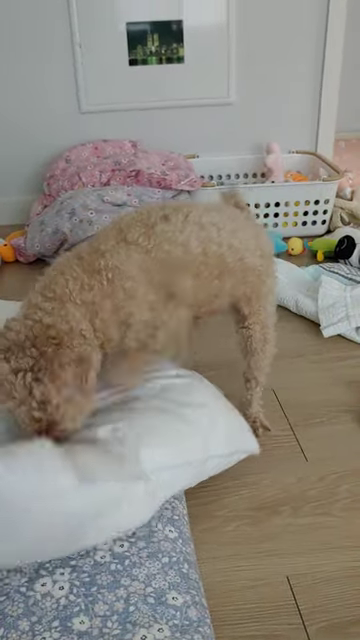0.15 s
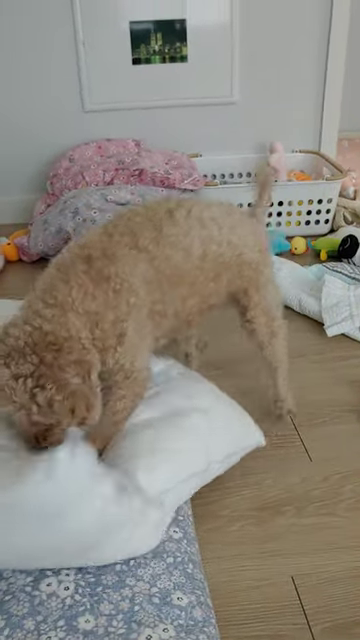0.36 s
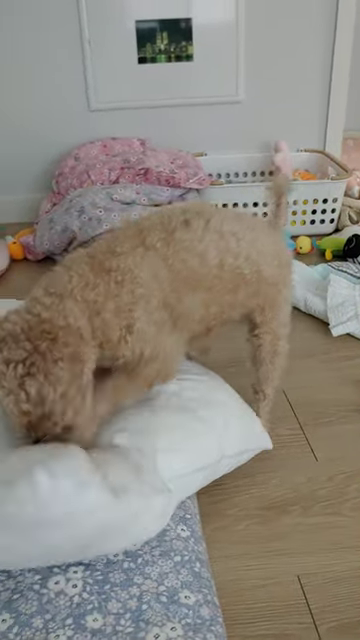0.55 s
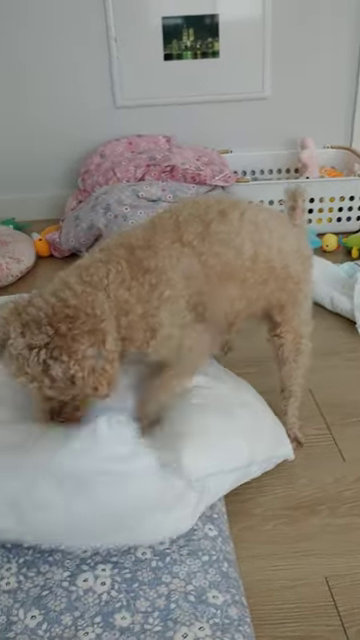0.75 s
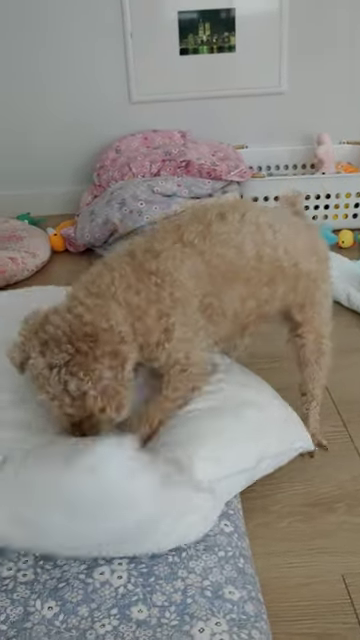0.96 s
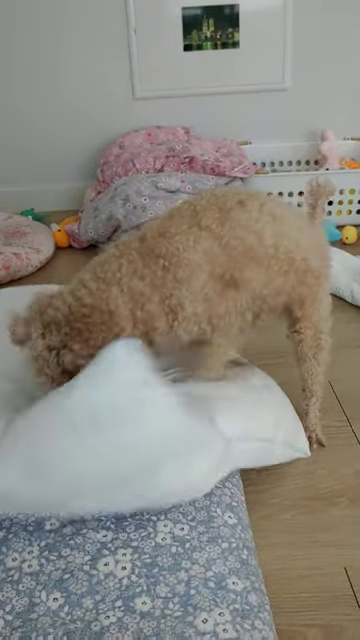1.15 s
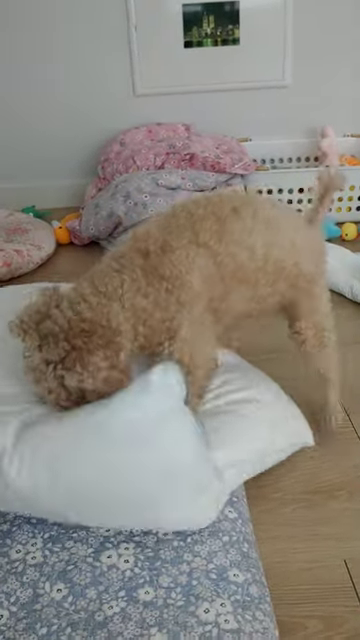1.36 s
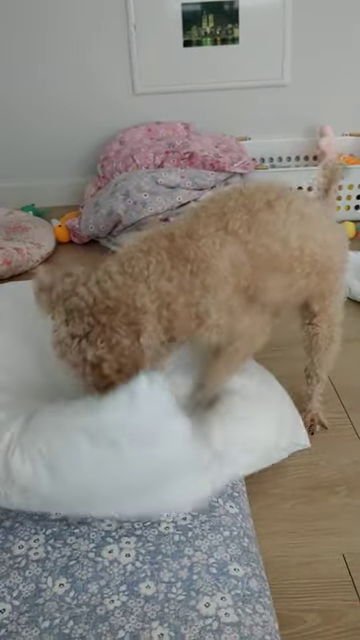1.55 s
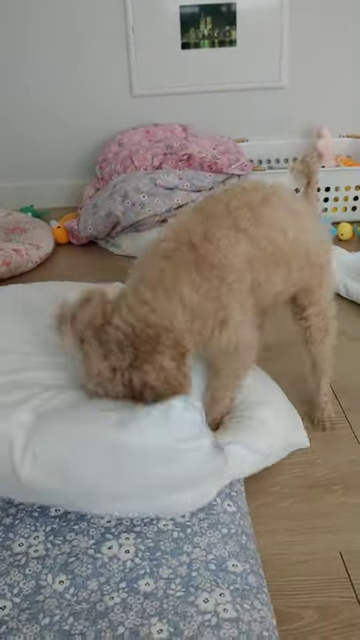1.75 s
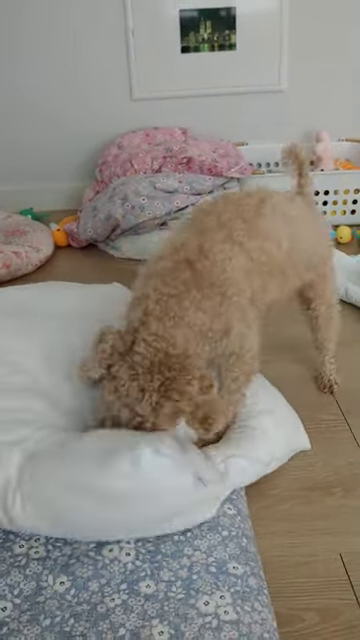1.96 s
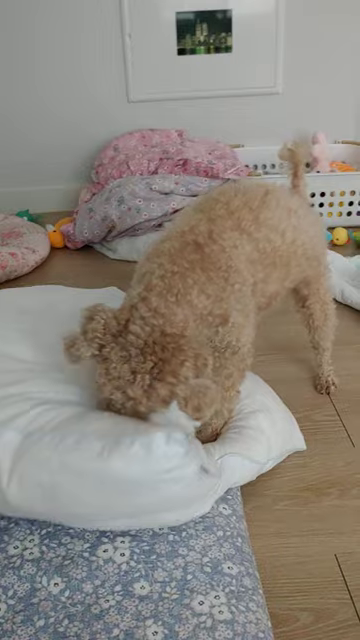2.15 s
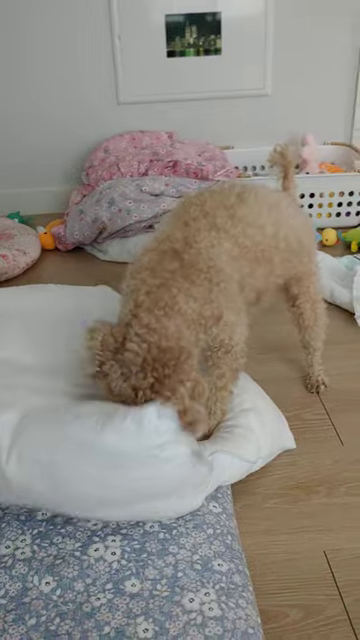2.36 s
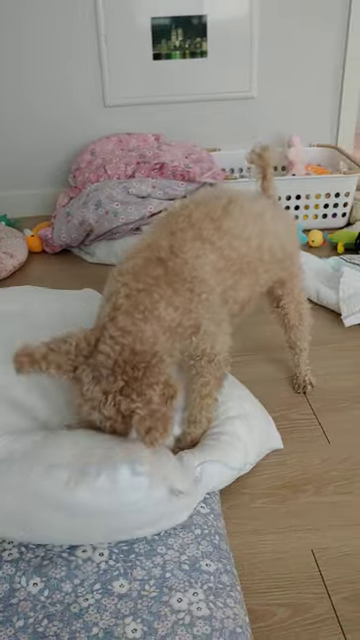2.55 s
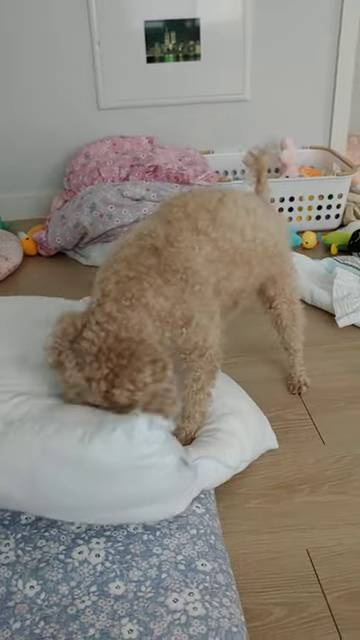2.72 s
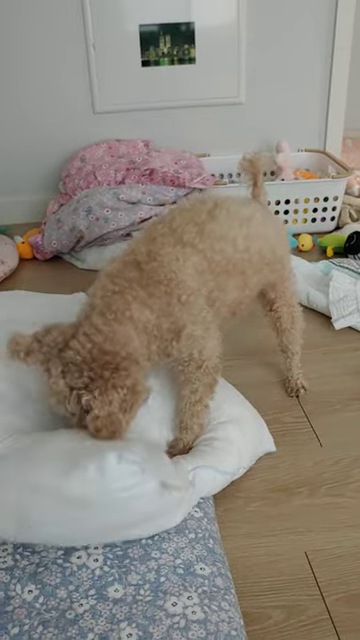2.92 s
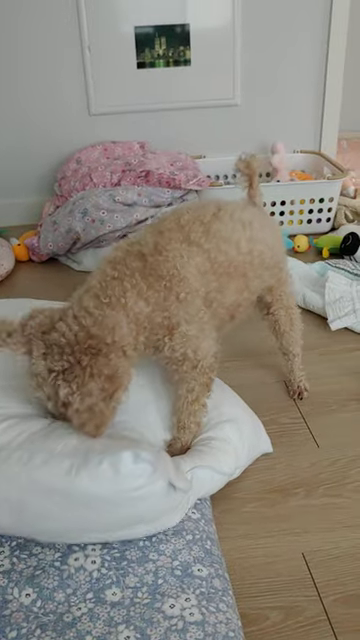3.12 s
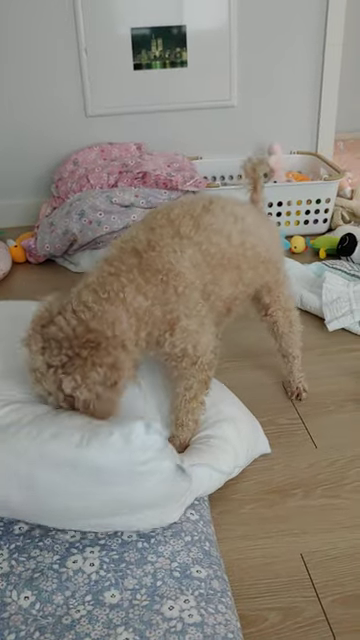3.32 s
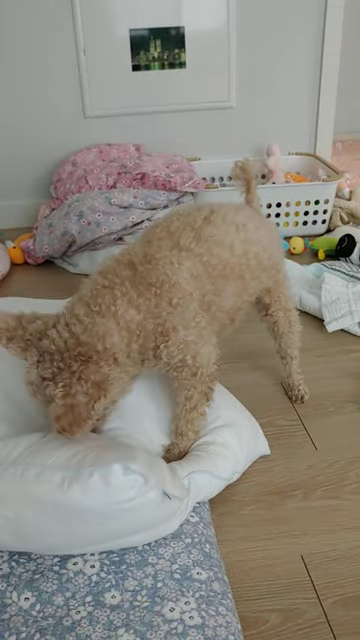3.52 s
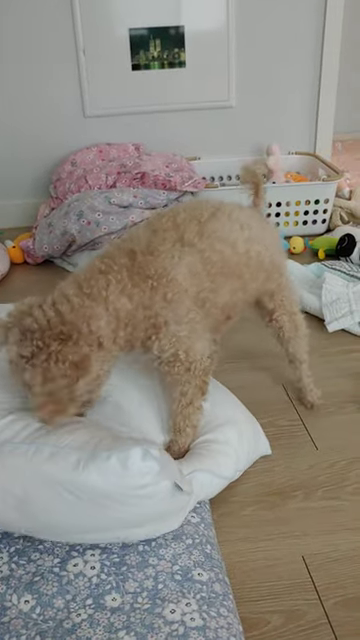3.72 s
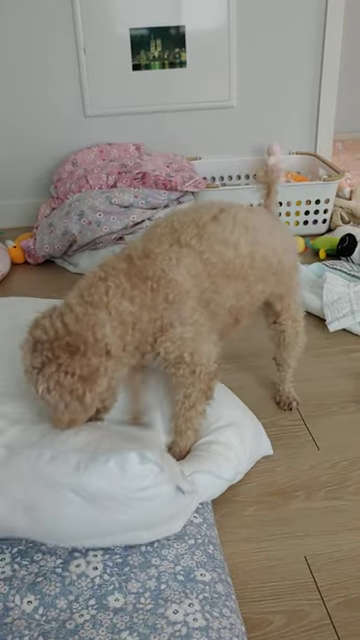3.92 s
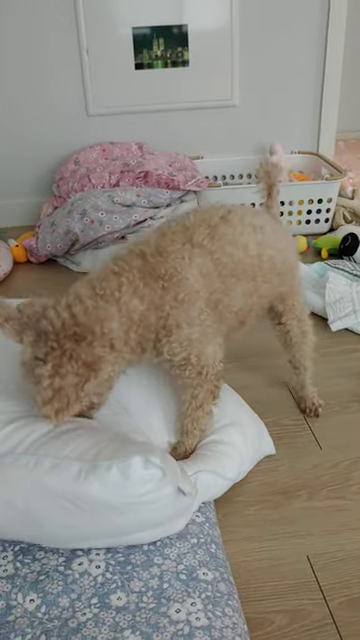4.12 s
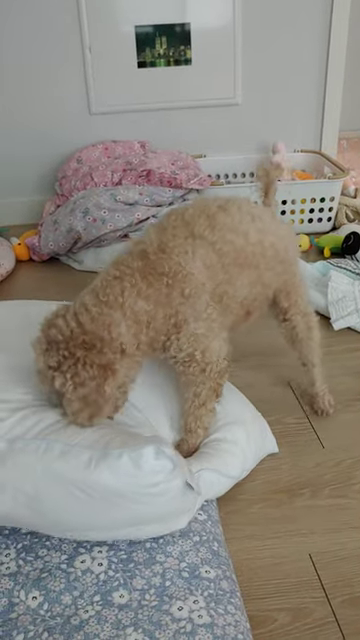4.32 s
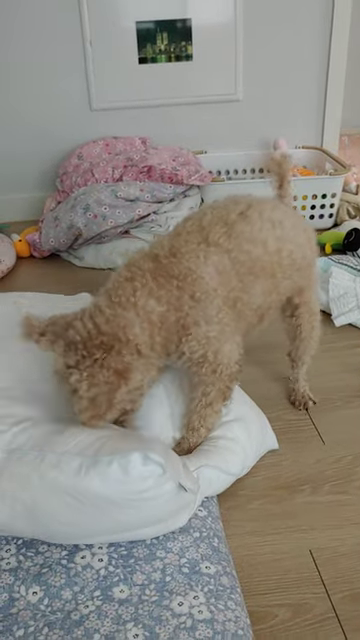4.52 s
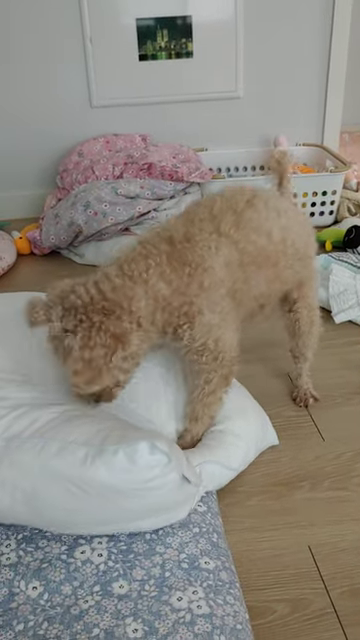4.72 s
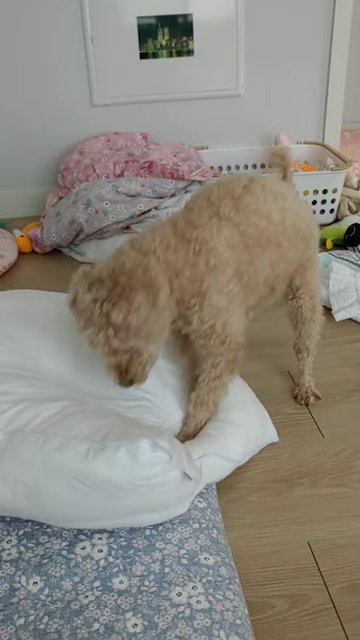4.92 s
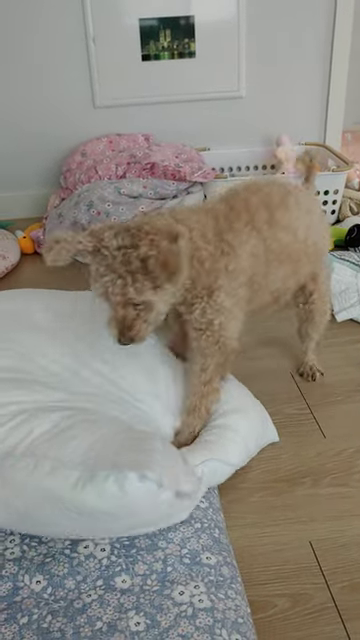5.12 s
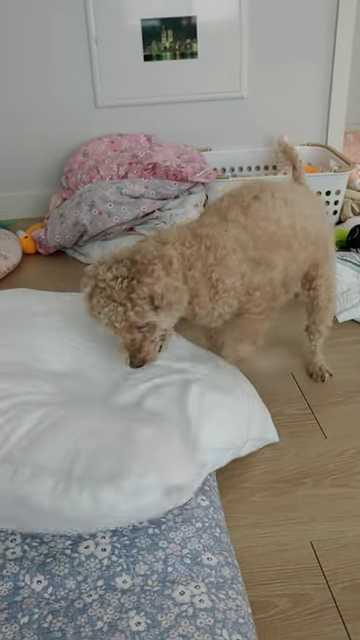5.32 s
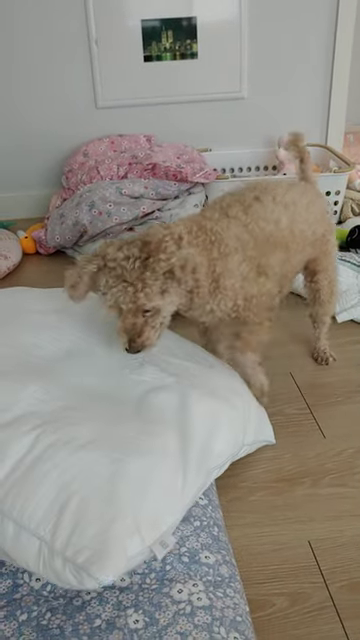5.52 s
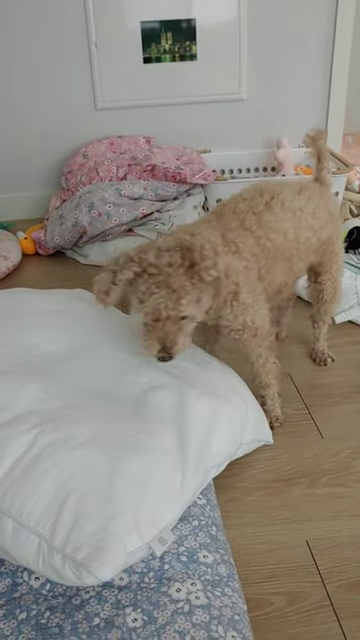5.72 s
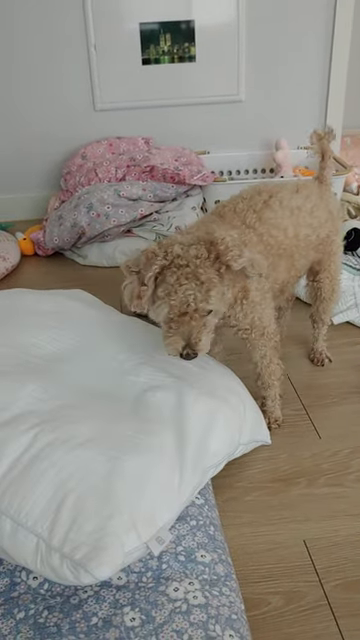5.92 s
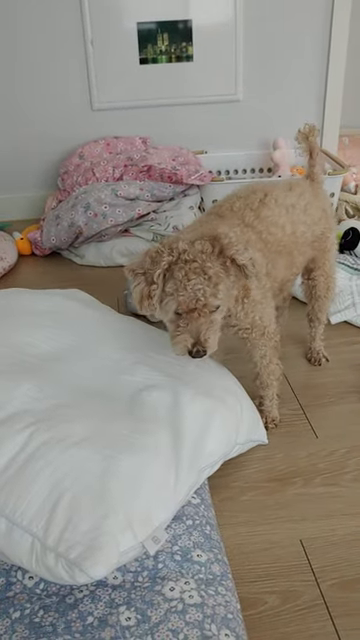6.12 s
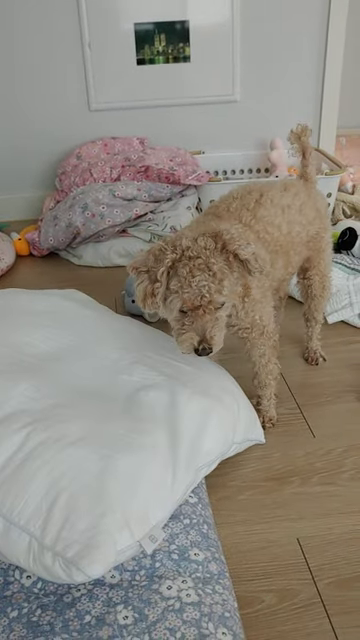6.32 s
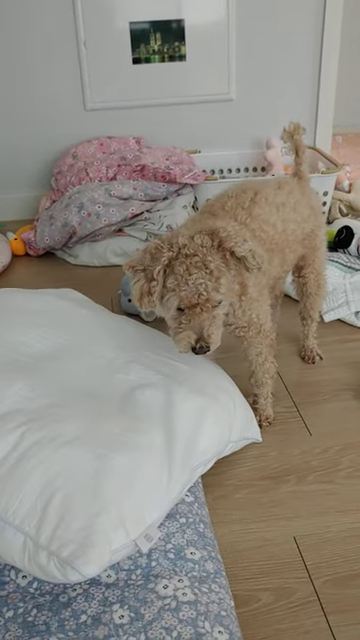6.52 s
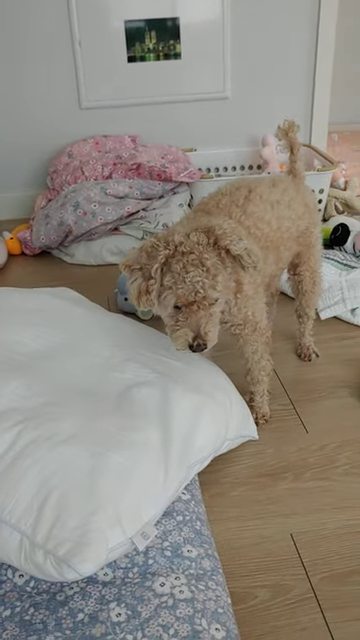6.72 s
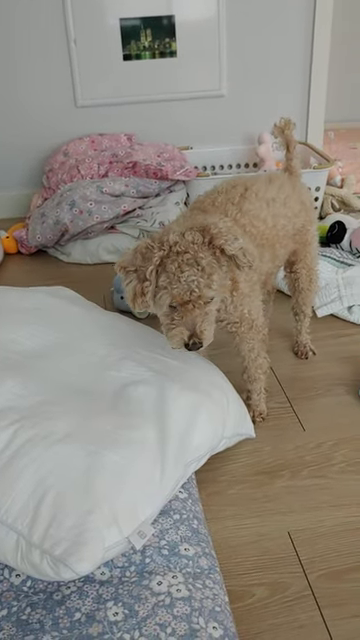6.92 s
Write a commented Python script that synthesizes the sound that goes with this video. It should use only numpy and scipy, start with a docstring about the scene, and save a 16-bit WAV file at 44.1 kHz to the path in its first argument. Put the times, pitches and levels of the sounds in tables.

```python
"""On a wooden floor in a quiet room, a small dog digs at a pillow close to a phone. Each paw stroke thuds through
the stuffing into the boards (noise and force pulses in low resonances); claws scrape (coloured grit), catch threads
(short sines) and zip over the weave (gliding tones). The cover rustles and snaps (grainy hiss). The dog snorts once
(noise in nasal resonances), then nudges the pillow. Room tone hums behind, with microphone hiss.
"""
import sys
import numpy as np
from scipy import signal
from scipy.fft import rfft, irfft, next_fast_len
from scipy.io import wavfile
from scipy.ndimage import uniform_filter1d, map_coordinates

SR = 44100
rng = np.random.default_rng(int(sys.argv[2]) if len(sys.argv) > 2 else 0)


def transcribe(signal):
    """Save signal, clipped to [-1, 1], as a 16-bit WAV file at the path in sys.argv[1]."""
    frames = np.atleast_2d(signal).T
    limited = np.clip(frames, -1, 1)
    pcm = np.round(limited * 32767).astype(np.int16)
    wavfile.write(sys.argv[1], SR, pcm)


N = 307397
T = np.arange(N) / SR

# pads on cloth, relative spectral density: freq_hz, density_db_per_hz
DRAG_COLOUR = [(250, -50), (650, -1.5), (1000, -2.5), (1600, -16), (2200, -26.5), (4000, -112)]


def amp(db):
    """Gain of a level in dB."""
    return 10 ** (np.asarray(db) / 20)


def unit(x):
    """Scaled to rms 1."""
    return x / np.sqrt(np.mean(x ** 2) + 1e-20)


def along(points, hz):
    """Interpolate (Hz, value) points on a log frequency axis."""
    point_hz, value = np.transpose(points)
    return np.interp(np.log(hz + 1), np.log(point_hz + 1), value)


def wobble(rate_hz):
    """Smooth random curve with rate_hz knots a second."""
    return map_coordinates(rng.standard_normal(int(N * rate_hz / SR) + 4), [T * rate_hz])


def filtered(x, response):
    """Filter x by a complex response of frequency."""
    size = next_fast_len(N + SR // 2)
    spectrum = rfft(x, size) * response(np.fft.rfftfreq(size, 1 / SR))
    return irfft(spectrum, size)[..., :N]


def resonances(modes):
    """Response of causal (centre_hz, width_hz, level_db) resonances, summed with alternating sign."""
    def response(f):
        total = 0
        for k, (centre, width, db) in enumerate(modes):
            damping = 1j * f * width
            total = total + (-1) ** k * amp(db) * damping / (centre * centre - f * f + damping)
        return total
    return response


def grit(rate_hz, spread_db, smooth, patchy_db):
    """Small slips of uneven size over a share of smooth noise; the colour wanders as the contact moves."""
    slips = (rng.random(N) < rate_hz / SR) * amp(spread_db * rng.exponential(size=N))
    slips = slips * rng.standard_normal(N)
    z = signal.stft(unit(slips) + smooth * rng.standard_normal(N), nperseg=512)[2]
    patches = uniform_filter1d(rng.standard_normal(z.shape), size=4, axis=0)
    patches = uniform_filter1d(patches, size=5, axis=1)
    return unit(signal.istft(z * amp(patchy_db * unit(patches)), nperseg=512)[1][:N])


def pair(noises, gain, alike):
    """Left and right from two unrelated signals, with a set likeness by frequency."""
    def mid_side(hz):
        turn = np.arccos(np.clip(along(alike, hz), -1, 1)) / 2
        return gain(hz) * [np.cos(turn), np.sin(turn)]
    mid, side = filtered(noises, mid_side)
    return np.array([mid + side, mid - side])


def swells(rows, fall_db_per_s):
    """Level in dB of gestures that rise, hold with a swell or sag, and fall; the loudest wins.

    Rows: full_s, rise_s, hold_s, level_db, optional swell_db.
    """
    rise_db = 19.5  # gained during a rise
    level = np.full(N, -140.0)
    for s, rise, hold, db, *swell_db in rows:
        span = slice(max(round((s - 0.4) * SR), 0), round((s + 0.8) * SR))
        t = T[span] - s
        held = db + sum(swell_db) * np.clip(t / max(hold, 0.001), 0, 1)
        before = rise_db * np.minimum(t, 0) / max(rise, 0.002)
        after = fall_db_per_s * np.maximum(t - hold, 0)
        level[span] = np.maximum(level[span], held + before - after)
    return level


def strokes():
    """Levels in dB of push, drag, scrape and rustle, all timed by the same paw strokes."""
    # full_s, rise_s, hold_s, swell_db, push_db, drag_db, scrape_db, rustle_db
    paw_strokes = [(0, 0.012, 0.063, -11, -43.5, -54, -68.5, -64),
                   (0.136, 0.036, 0.052, 8, -52.5, -64, -72.0, -75.5),
                   (0.31, 0.091, 0.084, 3.5, -48.0, -63.5, -71, -67.5),
                   (0.491, 0.058, 0.061, 4, -51.5, -63, -71.5, -71),
                   (0.679, 0.029, 0.063, -8, -33.0, -47.5, -69, -66.5),
                   (0.815, 0.043, 0.071, -4.5, -44.5, -55.5, -64.5, -67.5),
                   (1.043, 0.09, 0.17, -4, -52.5, -63.5, -70.5, -72.5),
                   (1.187, 0.037, 0.02, 5, -51.5, -63.5, -71, -72.5),
                   (1.34, 0.038, 0.069, -7.5, -45.5, -57, -67.5, -60.0),
                   (1.626, 0.081, 0.075, 2, -54.5, -63, -71, -67.5),
                   (1.784, 0.064, 0.101, -8.5, -51, -65, -74, -68.5),
                   (2.088, 0.048, 0.011, -1, -44.5, -59, -65.5, -71),
                   (2.419, 0.057, 0.036, -6, -46, -56.5, -66.5, -71.0),
                   (2.66, 0.045, 0.07, 0.5, -63, -68, -71, -76.5),
                   (2.724, 0.025, 0.022, -1.5, -47.5, -56, -66, -74.5),
                   (3.051, 0.035, 0.035, -8, -36, -53, -69, -71),
                   (3.35, 0.048, 0.0093, 3.5, -43.5, -59, -68.5, -77.5),
                   (3.412, 0.013, 0.0053, -8, -40.5, -56.5, -67.5, -73.5),
                   (3.659, 0.058, 0.006, 7, -47, -60, -67, -72),
                   (3.713, 0.013, 0.0058, -10.5, -33.5, -48.5, -64, -72),
                   (4.018, 0.06, 0.015, -3.5, -40, -54.5, -64.5, -72),
                   (4.323, 0.038, 0.026, -3, -38.5, -54.5, -67, -73),
                   (4.652, 0.06, 0.012, -4, -42.5, -52, -58.5, -64),
                   (4.666, 0.018, 0.006, -7, -31.5, -43, -54, -67),
                   (4.953, 0.028, 0.008, -4.5, -43.5, -56.5, -66.5, -75),
                   (4.988, 0.019, 0.011, 0.5, -41.5, -48.5, -65, -72),
                   (5.155, 0.065, 0.11, 2.5, -73, -78.5, -75, -78.5),
                   (5.278, 0.056, 0.052, -4, -58.5, -61.5, -67.5, -65),
                   (5.353, 0.057, 0.041, 5, -65.5, -67, -73.5, -71.0),
                   (5.804, 0.078, 0.05, 2.5, -77, -80.0, -84.5, -91.0),
                   (6.03, 0.013, 0.051, -6, -43.5, -51.0, -78.5, -97)]
    falls_db_per_s = 220, 209, 270, 180  # push, drag, scrape, rustle
    curves = []
    for k, fall in enumerate(falls_db_per_s):
        rows = [(s, rise, hold, levels[k], swell_db) for s, rise, hold, swell_db, *levels in paw_strokes]
        curves.append(swells(rows, fall))
    return curves


def paws():
    """Landings shake the boards to their lowest modes; the lighter pushes only knead the stuffing above them."""
    # landings: time_s, weight_db, tap_db (toe tap relative to the weight)
    landings = [(0.137, -35, -9), (0.493, -34, -7), (0.543, -37, 1), (0.683, -27, 0), (0.693, -23, -4),
                (0.819, -50, -4), (0.874, -37, -8), (1.041, -34.5, -6), (1.192, -41, -13), (1.335, -29, 0),
                (2.078, -31, -0.5), (2.407, -33, -4), (2.722, -32, -5), (3.037, -23.5, -4),
                (3.065, -36, -6), (3.349, -30.5, 5.5), (3.409, -31.5, -9), (3.665, -28.5, -11),
                (3.704, -31, -16), (4.011, -29, -1), (4.319, -23.5, -15), (4.616, -25.5, -6),
                (4.942, -36, -1.5), (4.989, -39, -4), (5.272, -44, 5.5), (5.386, -43, -2), (6.022, -46, 5)]
    # floor and stuffing resonances: centre_hz, width_hz, level_db
    board_modes = [(72, 22, -10), (117.6, 33, 2.5), (169.6, 33, -1), (231.5, 30.7, -0.5), (304, 66, -3.5),
                   (400.8, 43.7, -1), (530.8, 38.4, -3.5), (595, 38, -5)]
    push_db = strokes()[0]
    modes = resonances(board_modes)

    def boards(hz):
        return modes(hz) / (1 + 1j * hz / 900) ** 2  # the padding swallows the treble

    def stuffing(hz):
        return boards(hz) * (1j * hz / 170) / (1 + 1j * hz / 170)

    def pad_force(u):
        return u ** 2 * (3 - u) * np.exp(-u)  # the force swells and lets go

    lumps = grit(rate_hz=400, spread_db=1.5, smooth=1.0, patchy_db=2.0)
    lumps = lumps / np.std(filtered(lumps, boards))
    blows, settle = np.zeros(N + SR), np.zeros(N + SR)
    t = np.arange(SR // 8) / SR
    for s, db, tap_db in landings:
        start = round((s + 0.003014) * SR)
        force = pad_force(t / 0.00095) + amp(tap_db) * pad_force(t / 0.00035)
        blows[start:][:len(t)] += amp(db - 6.5) * force
        settle[start:][:len(t)] += amp(db - 11.5 - 60 * t / 0.14)  # the stuffing settles after the landing
    blows, settle = blows[:N], settle[:N]
    knead = filtered(amp(push_db + 1.77 * wobble(40)) * lumps, stuffing)
    thud = filtered(settle * lumps + 2.0 * blows, boards)
    creases = unit(filtered(lumps, lambda hz: amp(along(DRAG_COLOUR, hz))))
    crush = amp(-25.0) * settle * creases  # the cover creases with it
    return knead + thud + 1.26 * blows + crush


def scrapes():
    """Pads and claws drag over the cover: one stream of slips in a dull and a bright colour."""
    # claws on cloth, relative spectral density: freq_hz, density_db_per_hz
    scrape_colour = [(700, -59), (1500, -3), (2300, 0.5), (3300, -10), (4000, -16), (7000, -32)]
    _, drag_db, scrape_db, _ = strokes()
    slips = grit(rate_hz=900, spread_db=1.0, smooth=0.89, patchy_db=3.5)
    drag = unit(filtered(slips, lambda hz: amp(along(DRAG_COLOUR, hz))))
    scrape = unit(filtered(slips, lambda hz: amp(along(scrape_colour, hz))))
    return amp(1.22 * wobble(60)) * (amp(drag_db) * drag + amp(scrape_db) * scrape)


def snags():
    """Claws catch single threads: short decaying sines scattered around 2100 Hz."""
    # start_s, level_db
    catches = [(0.4848, -44), (0.8086, -42.5), (3.066, -55), (3.654, -45), (3.7104, -45.5), (4.004, -44),
               (4.2984, -57), (4.3634, -46), (4.6615, -47), (4.6674, -45), (4.67, -30), (4.9853, -35.5),
               (4.991, -46), (5.0001, -37), (5.2729, -49)]
    out = np.zeros(N + SR)
    t = np.arange(SR // 50) / SR
    for s, db in catches:
        pitch_hz = 2100 * (1 + 0.11 * rng.standard_normal())
        envelope = amp(db - 60 * t / 0.0044) * (1 - np.exp(-t / 0.0003))
        out[round(s * SR):][:len(t)] += envelope * np.sin(2 * np.pi * pitch_hz * t)
    return out[:N]


def zips():
    """Claws on fast strokes sing at the rate at which they cross the threads of the weave."""
    # peak_s, first_rate_hz, settled_rate_hz, peak_db, t60_s
    runs = [ (2.099, 1612, 1535, -52, 0.19), (3.07, 1650, 1597, -54.5, 0.17),
            (3.345, 2250, 2480, -63, 0.17), (3.38, 1850, 1599, -48.5, 0.21),
            (3.652, 2500, 1880, -56, 0.059), (3.689, 1628, 1497, -46, 0.22),
            (4.945, 2200, 2160, -60.5, 0.13), (5.25, 2700, 2780, -72, .15), (5.285, 1497, 1610, -59, .22),
            (5.379, 2030, 2080, -61.5, 0.14), ]
    rise_s, settle_s = 0.0183, 0.0142
    out = np.zeros(N)
    for s, first_hz, settled_hz, peak_db, t60 in runs:
        glide = np.exp(-np.maximum(T - s + rise_s / 2, 0) / settle_s)
        hz = settled_hz + (first_hz - settled_hz) * glide
        db = swells([(s, rise_s, 0, peak_db)], 60 / t60)
        # the claw stutters, so the pitch wavers
        phase = 2 * np.pi * np.cumsum(hz * (1 + 0.028 * wobble(200))) / SR
        overtone = amp(-19) * (hz < 1950) * np.sin(2 * phase)  # only slow strokes carry it
        out += amp(db + 2.5 * wobble(120)) * (np.sin(phase) + overtone)
    return out


def cover():
    """The fabric hisses in fine grains as it slides and gives a few ticks and flicks."""
    # the cover slipping by itself: full_s, rise_s, hold_s, level_db
    slides = [(0.945, 0.045, 0.079, -73.5), (1.535, 0.008, 0.024, -67.5), (1.86, 0.02, 0.04, -62.5),
              (3.129, 0.043, 0.02, -78.5), (3.827, 0.028, 0.0087, -73.5), (4.116, 0.035, 0.013, -68),
              (5.096, 0.014, 0.014, -57.5), (5.186, 0.055, 0.034, -75), (5.595, 0.06, 0.073, -67),
              (5.744, 0.013, 0.02, -66.0)]
    # crisp ticks and short flicks: peak_s, peak_db, rise_s, t60_s
    snaps = [ (0.5097, -52, .0003, 0.014), (1.431, -48, 0.0047, 0.027), (1.534, -47.5, 0.00023, 0.014),
             (1.865, -46.5, 0.0055, 0.021), (1.912, -47, 0.0018, 0.018), (3.1234, -58, 0.00024, 0.0084),
             (3.49, -62.5, 0.00025, 0.0083), (3.906, -66, 0.00034, .012), (4.102, -58, 0.00045, 0.011),
             (4.12, -48, 0.00064, 0.01), (4.501, -54, 0.00024, 0.0069), (5.085, -50, .0003, 0.012),
             (5.101, -49, 0.0085, 0.027), (5.4998, -57.5, .0003, 0.012), (5.5558, -53, 0.00024, 0.012),
             (5.7434, -46.5, 0.00026, 0.0078), ]
    # relative spectral density: freq_hz, density_db_per_hz
    cloth_colour = [(2060, -20), (3500, -13.5), (5160, -11.5), (6530, 0.5), (7850, -4), (8910, -2.5),
                    (9810, -6.5), (10900, -19.5), (12600, -2.5), (15100, -16.5), (16000, -2)]

    def colour(hz):
        return amp(along(cloth_colour, hz))

    db = np.maximum(strokes()[-1], swells(slides, fall_db_per_s=315))
    rub = amp(db + 2.2 * wobble(70)) * grit(rate_hz=2500, spread_db=2.5, smooth=0.74, patchy_db=3.0)
    flick = np.zeros(N)
    for s, peak_db, rise, t60 in snaps:
        away = abs(T - s)
        before = amp(peak_db) * np.exp(-away / max(rise, 1e-4))
        after = amp(peak_db - 60 * away / max(t60, 0.002))
        flick += np.where(T < s, before, after)
    cloth = rub + flick * rng.standard_normal(N)
    colour_rms = np.sqrt(np.mean(colour(np.linspace(0, SR / 2, num=999)) ** 2))
    return filtered(cloth, colour) / colour_rms


def snort():
    """Air forced through the nose: turbulent noise in its resonances."""
    # full_s, rise_s, hold_s, level_db
    breath = (5.592, .018, .075, -58.5)
    # centre_hz, width_hz, level_db
    nose_modes = [(655, 110, 4.5), (1074, 37, 10), (1500, 150, 3.5), (2130, 210, 1.5), (2590, 100, 11),
                  (3040, 470, -1.5)]
    db = swells([breath], fall_db_per_s=330)
    flow = unit(filtered(rng.standard_normal(N), resonances(nose_modes)))
    return amp(db + 0.95 * wobble(50)) * flow


def arrive(x, lag_s):
    """The phone's two ports sit apart, so they differ in colour and phase; lag_s is the extra path to the left."""
    # freq_hz, left_minus_right_db
    port_tilt = [(60, -1), (150, 2), (380, -4.5), (950, -6.5), (2380, 0.5), (5980, 7.5), (15000, -13)]
    # freq_hz, left_lead_rad
    port_lead = [(0, 0), (600, -0.3), (1000, 2), (1900, -1), (3000, 0.5), (3800, 4), (5000, 5.5),
                 (15000, 8)]
    side = np.array([[1], [-1]]) / 2

    def ports(hz):
        phase = along(port_lead, hz) - 2 * np.pi * hz * lag_s
        return amp(side * along(port_tilt, hz)) * np.exp(1j * side * phase)
    return filtered(x, ports)


def room(x):
    """Floor and furniture answer in a fast decay, walls in a longer one; new tail every 0.3 s as the dog moves."""
    # freq_hz, t60_s
    wall_t60 = [(100, 0.39), (600, 0.18), (3000, 0.31), (12000, 0.16)]
    # freq_hz, left_right_likeness
    tail_alike = [(200, 0.98), (500, 0.56), (1500, 0.033)]
    out, step, delay = np.zeros((2, N + SR)), int(0.3 * SR), 40  # samples
    for start in range(0, N, step):
        hz, t, z = signal.stft(rng.standard_normal((2, SR // 2)), SR, nperseg=256)
        walls = amp(-60 * t / along(wall_t60, hz)[:, None])
        floor_and_furniture = amp(4.5 - 60 * t / 0.043)
        tail = signal.istft(z * (walls + floor_and_furniture), SR, nperseg=256)[1]
        tail = tail / np.linalg.norm(tail[0])
        wet = signal.fftconvolve(x[None, start:start + step], tail, axes=1)
        out[:, start + delay:start + delay + wet.shape[1]] += wet
    return pair(out[:, :N], np.ones_like, tail_alike)


def air():
    """Steady coloured noise: low hum of the house with the microphone's own hiss on top."""
    # relative spectral density: freq_hz, density_db_per_hz
    air_colour = [(20, -34), (43, -8), (60, 3), (82, -14), (123, -11.5), (150, -24), (185, -10.5),
                  (249, -21.5), (301, -11.5), (400, -22), (1000, -29.5), (4000, -40.5), (10800, -51.5),
                  (12300, -33), (16000, -35)]
    # freq_hz, left_right_likeness
    air_alike = [(60, 0.91), (240, 0.88), (950, 0.02), (3770, 0.0), (15000, 0.013)]
    level_db = -67.5
    noises = rng.standard_normal((2, N))
    return amp(level_db) * unit(pair(noises, lambda hz: amp(along(air_colour, hz)), air_alike))


def scene():
    """Direct sound from a contact that wanders between two spots, room answer and room tone."""
    low = paws()
    mid = scrapes() + snags() + zips() + snort()
    high = cover()
    near = amp(0.5) * (low + mid + high)
    far_share = (1 + np.tanh(1.5 * wobble(6))) / 2  # share of the sound from the far spot
    direct = arrive(near * (1 - far_share), lag_s=0) + arrive(near * far_share, lag_s=7e-5)
    answer = room(amp(-3.5) * low + amp(-2.5) * mid + amp(2.5) * high)
    return direct + answer + air()


def record(dry):
    """The phone keeps nothing above its band limit."""
    top_hz = 15830
    return filtered(dry, lambda hz: hz < top_hz)


dry = scene()
out = record(dry)
transcribe(out)
```